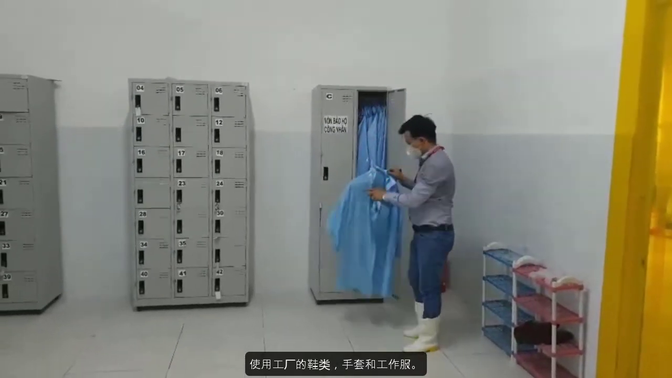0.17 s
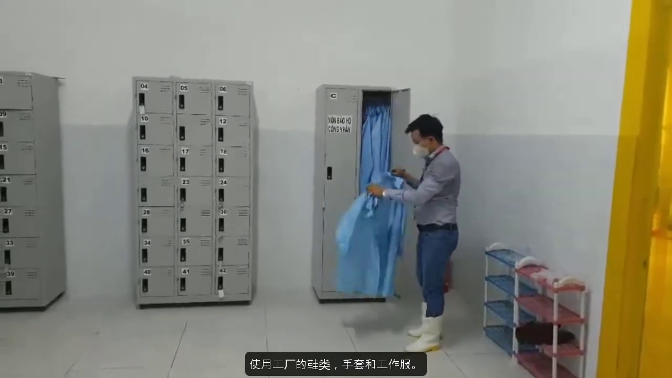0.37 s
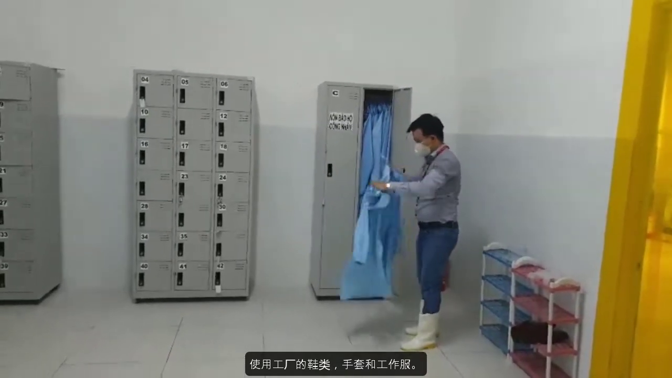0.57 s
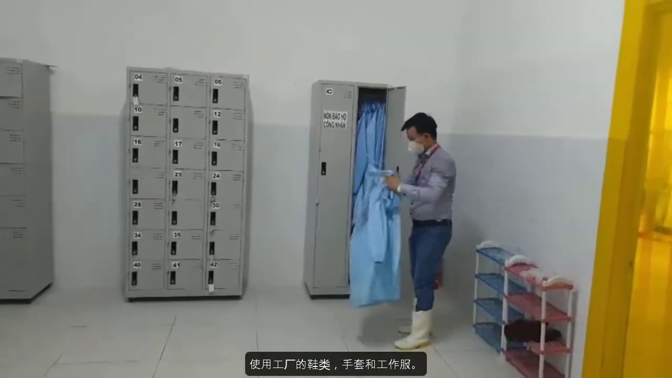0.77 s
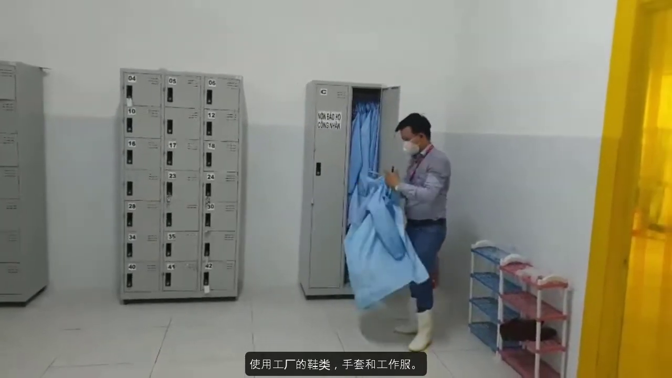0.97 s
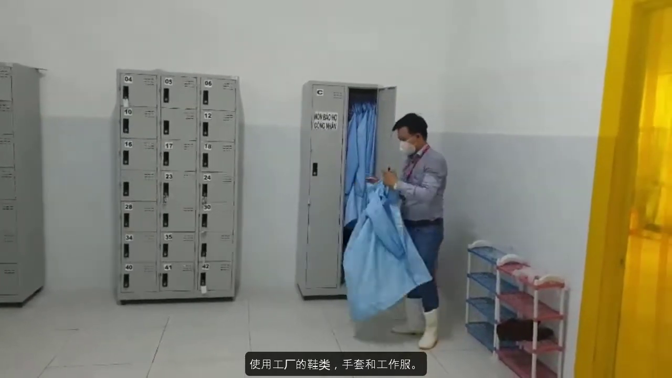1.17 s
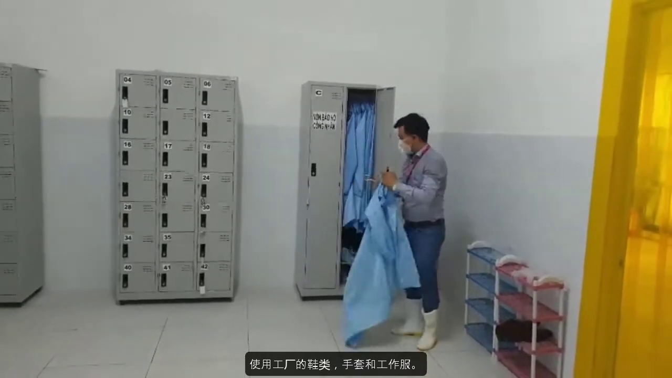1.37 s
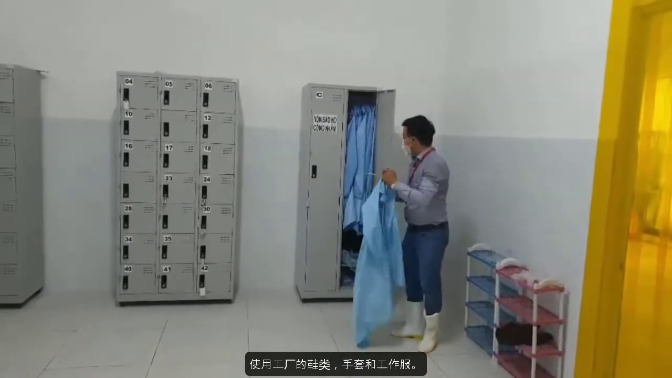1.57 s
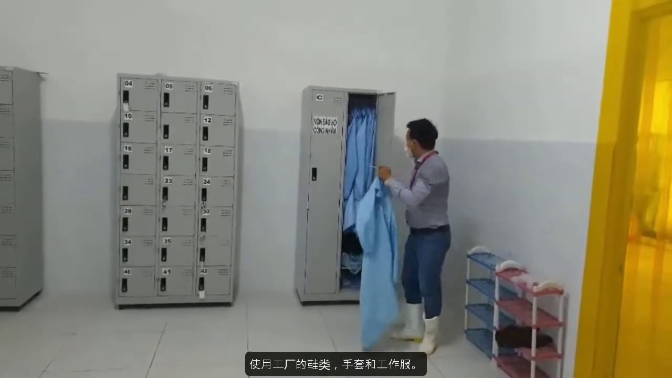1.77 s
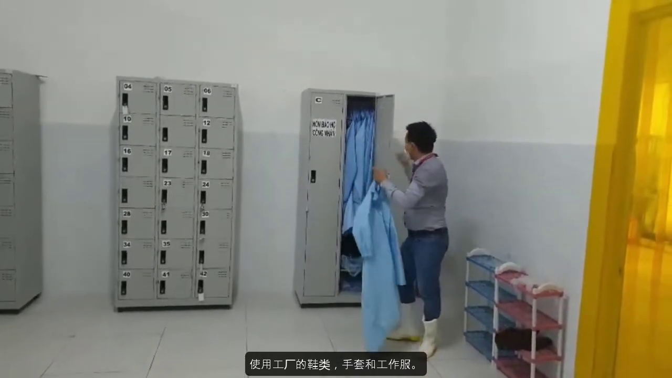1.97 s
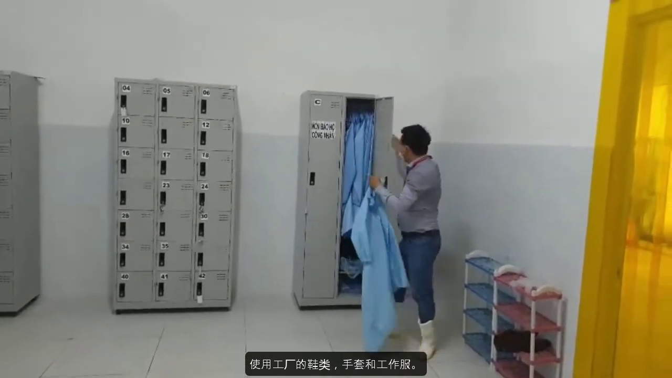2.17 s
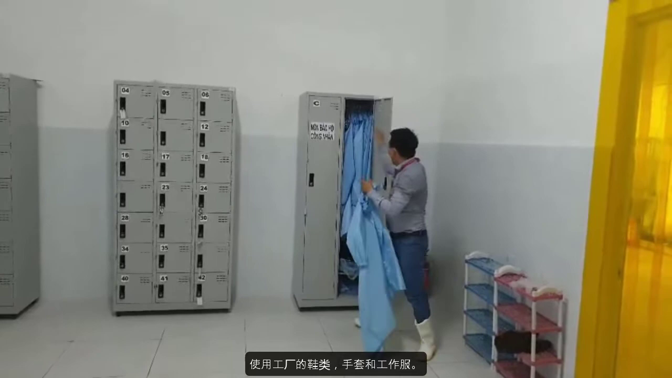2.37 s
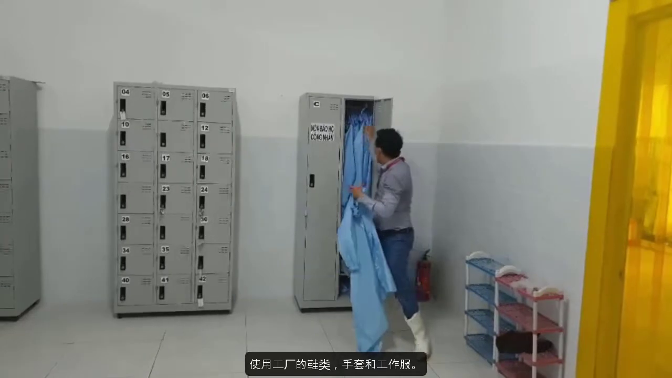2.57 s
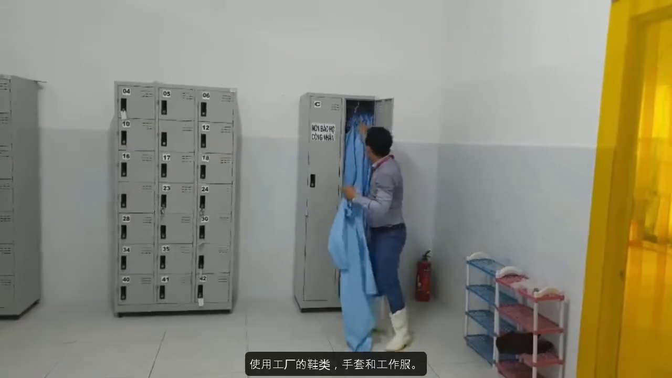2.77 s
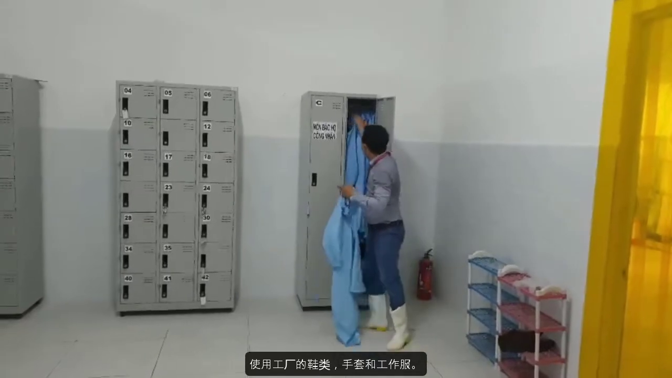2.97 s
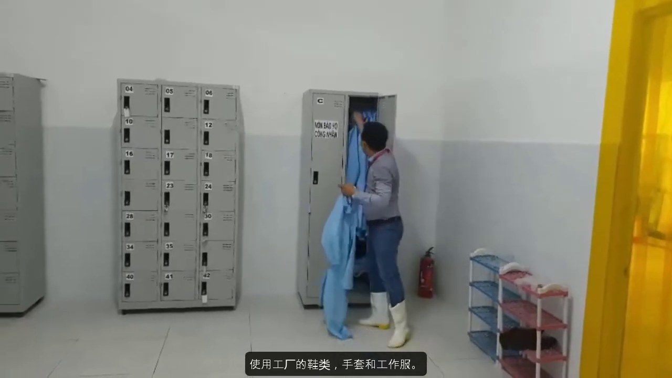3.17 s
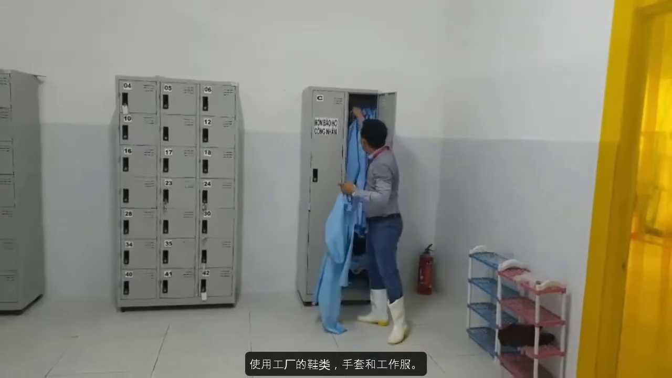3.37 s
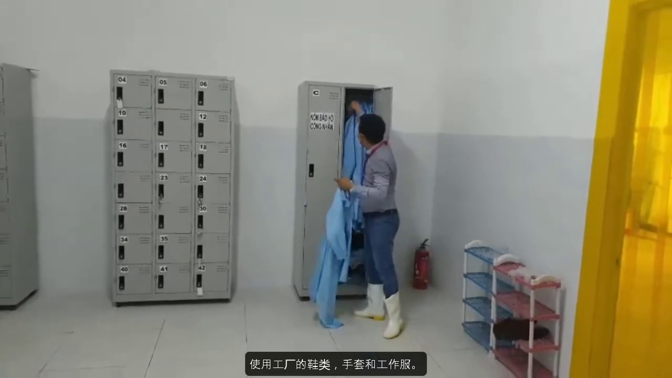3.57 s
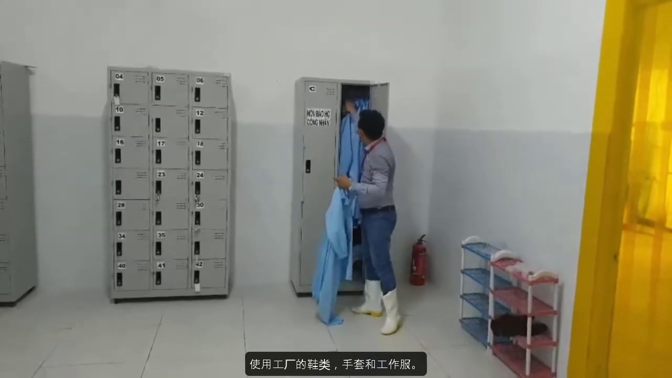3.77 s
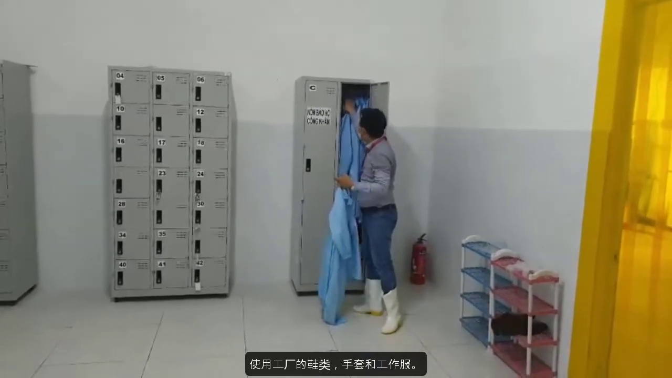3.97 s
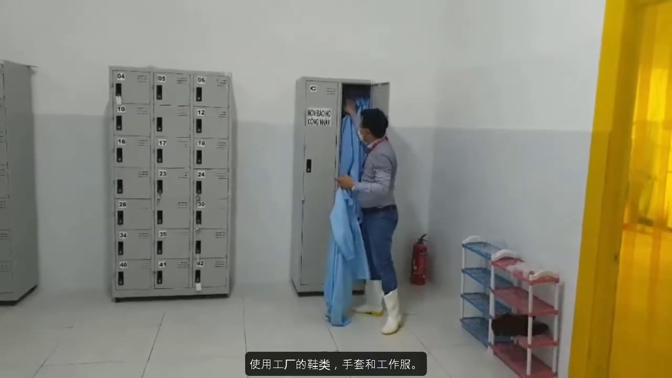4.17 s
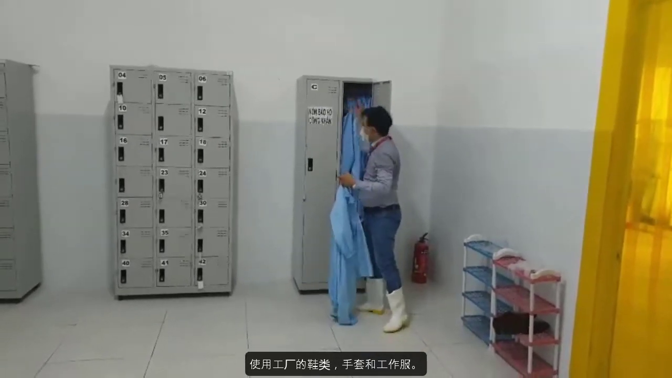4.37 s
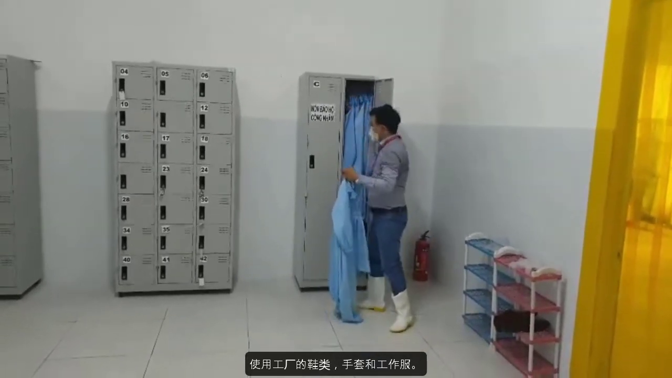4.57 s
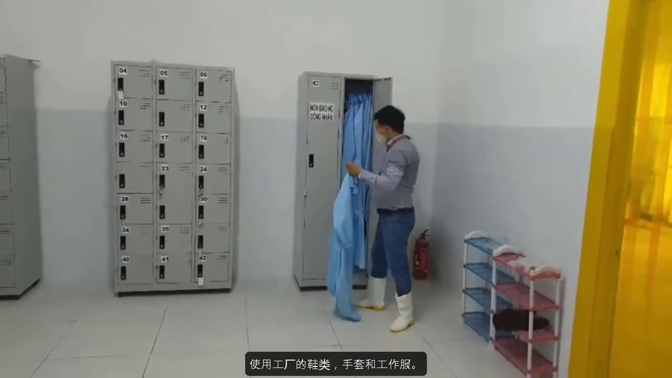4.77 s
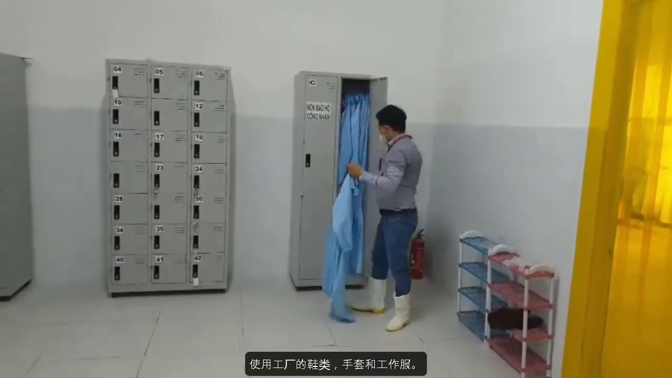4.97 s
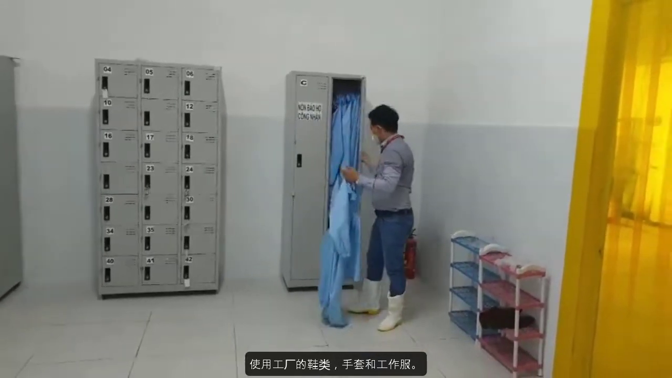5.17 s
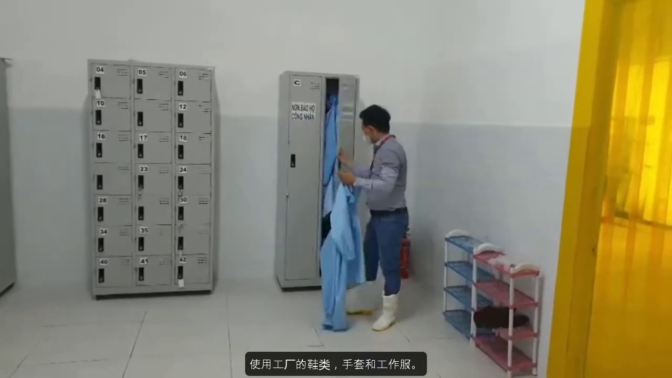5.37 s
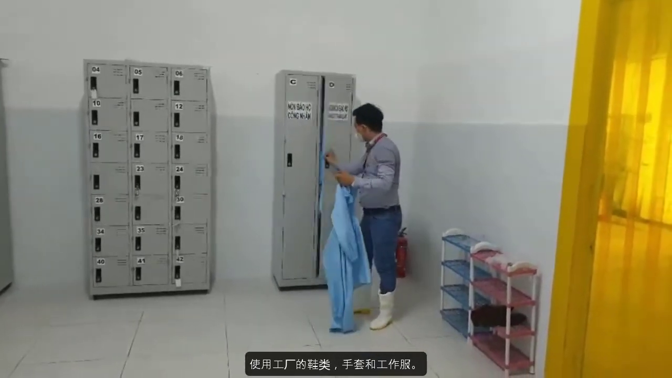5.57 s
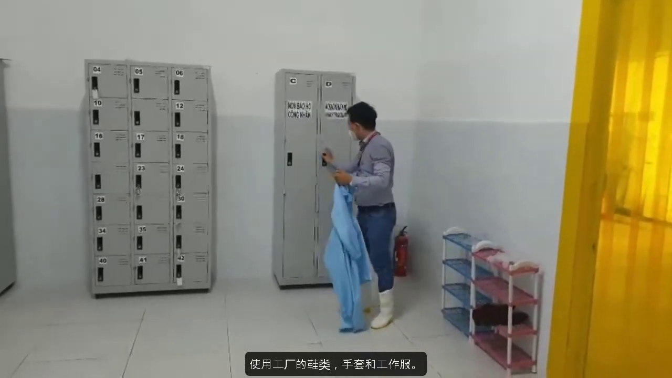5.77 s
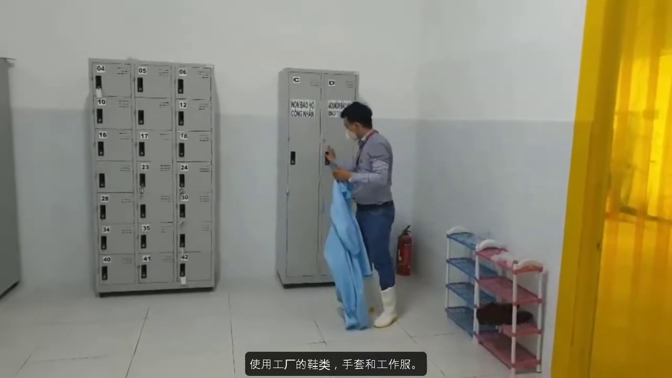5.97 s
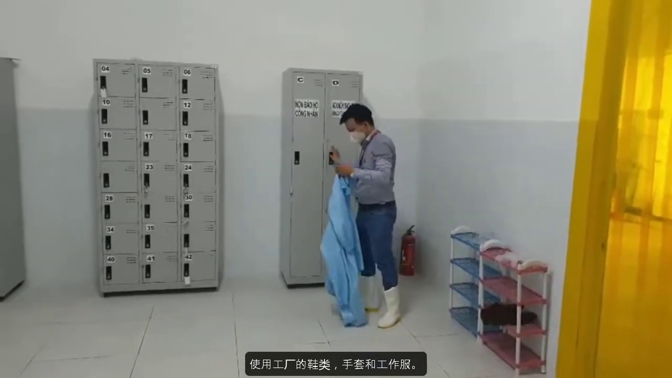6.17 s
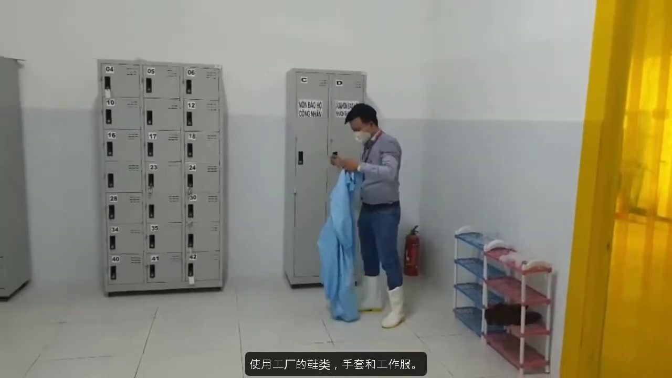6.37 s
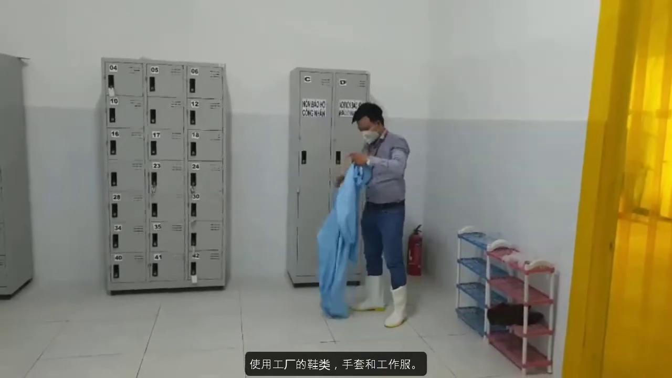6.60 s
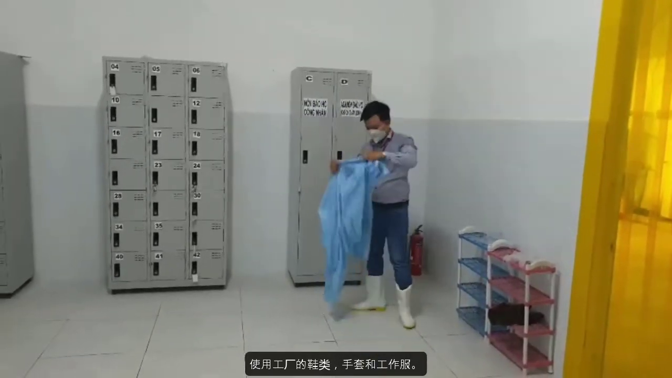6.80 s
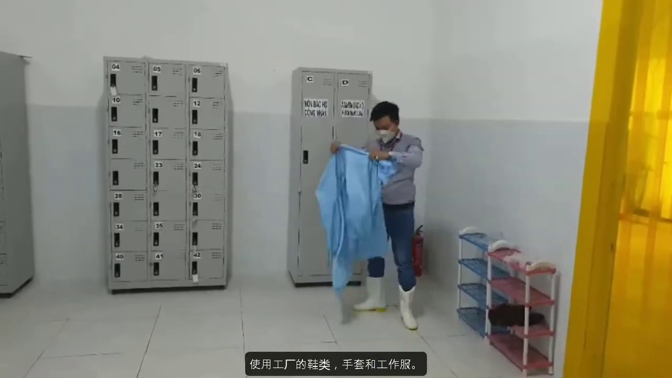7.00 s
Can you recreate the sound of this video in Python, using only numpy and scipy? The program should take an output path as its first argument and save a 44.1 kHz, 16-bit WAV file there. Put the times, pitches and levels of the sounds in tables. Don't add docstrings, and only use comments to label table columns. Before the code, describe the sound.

A phone a few metres off picks up a reverberant room with a steady fan drone and rush of duct air. Light fabric rustle comes first, followed midway by sharp, bright hanger clicks and small metallic slides among heavier cloth movement. Near the end a sheet-steel locker door slams, clattering and booming by far the loudest, and the level dips slightly as the echo fades under more rustling.

```python
import sys
import numpy as np
from scipy import signal
from scipy.fft import rfft, irfft, next_fast_len
from scipy.io import wavfile
from scipy.ndimage import uniform_filter1d, map_coordinates

SR = 44100
rng = np.random.default_rng(int(sys.argv[2]) if len(sys.argv) > 2 else 0)


def waveform_to_disk(signal):
    frames = np.transpose(np.atleast_2d(signal))
    scaled = np.clip(frames, -1, 1) * 32767
    samples = np.round(scaled).astype(np.int16)
    wavfile.write(sys.argv[1], SR, samples)


def nominal_scale(level):
    x = np.asarray(level, float) / 20
    return 10 ** x


N = 310280

# f/Hz, likeness (1 = same)
LEFT_RIGHT_LIKENESS = [(30, 0.98), (130, 1), (250, 0.91), (500, 0.66), (1000, 0.059), (12000, 0.018)]
# f/Hz, fade/s
WALL_FADE = [(100, 0.25), (200, 0.67), (320, 1.4), (600, 1.3), (2000, 1.59), (5000, 1.13), (8000, 0.8),
             (13000, 0.41)]
LAG = 17

# f/Hz, level/dB (per Hz)
AIR_SPECTRUM = [(12, -62), (20, -19), (54, -23), (81, -3), (145, -9.5), (171, -11.5), (247, -10), (286, -4),
                (349, -12.5), (383, -10), (523, -15), (714, -12), (1600, -42), (2080, -74), (3520, -120)]
# f/Hz, level/dB (per Hz)
HISS_SPECTRUM = [(880, -5), (1500, -4), (1570, -12), (1780, -11), (1940, -10), (2230, -12.5), (3120, -31.5),
                 (6470, -18), (8280, -34.5), (9640, -27.5), (14500, -37)]
AIR_DB, HISS_DB = -29.5, -49
# f/Hz, width/Hz, level/dB
DUCT_BANDS = [(59, 12, -44.5), (215, 20.4, -41.5), (419.7, 12, -46.5), (565.4, 5.8, -47), (708, 27, -42),
              (760, 23, -44.5), (1282, 19, -55.5)]
# middle t/s, length/s, level/dB
LOW_BEATS = [(0.204, 0.69, -30.5), (0.616, 0.29, -30.5), (.95, 0.39, -27), (1.4, 0.42, -33),
             (1.727, 0.21, -31), (2.04, 0.31, -33.5), (2.555, 0.61, -32.5), (3.31, 1, -37.5),
             (4.004, .36, -35), (4.3, 0.28, -29), (4.68, 0.54, -29.5), (5.306, 0.44, -26.5),
             (5.78, 0.64, -28), (6.85, 1, -32)]
# middle t/s, length/s, level/dB
MIDDLE_BEATS = [(.2, .45, -37), (0.898, 0.49, -33.5), (1.596, 0.68, -36), (2.337, 0.94, -32),
                (2.85, 0.33, -34), (3.406, 0.51, -30.5), (4.35, 0.89, -33.5), (4.9, 0.42, -32),
                (5.3, 0.57, -38), (5.95, 0.73, -30.5), (6.75, 0.45, -32.5)]
# middle t/s, length/s, level/dB
HIGH_BEATS = [(.25, 0.49, -36), (0.806, 0.62, -28.5), (1.216, 0.46, -26.5), (1.753, 0.92, -36),
              (2.44, 0.41, -27), (2.997, .5, -36.5), (3.55, 0.63, -34.5), (3.948, 0.14, -32.5),
              (4.396, 0.42, -30.5), (5.155, 0.3, -32), (5.61, 0.15, -35.5), (5.997, 0.52, -36.5),
              (6.75, 0.89, -35)]
# f/Hz, its swells
FAN_TONES = [
    (87.36, LOW_BEATS),
    (139.3, MIDDLE_BEATS),
    (279.8, HIGH_BEATS),
]

# f/Hz, level/dB (per Hz)
RUSTLE_SPECTRUM = [(1530, -6.5), (2600, -5.5), (3630, -5), (6720, -1), (8000, -10.5), (10400, -21.5),
                   (17600, -120)]
# f/Hz, level/dB (per Hz)
CRISP_SPECTRUM = [(4590, -27), (7800, -10), (8660, -8.5), (11400, -3), (14500, -6.5), (15600, -8.5)]
# f/Hz, level/dB (per Hz)
FOLD_SPECTRUM = [(260, -19), (450, -1.5), (596, -11), (783, 1), (959, -6.5), (1130, -5), (1430, -7.5),
                 (2900, -14), (3770, -48), (6380, -120)]
# start t/s, length/s, rustle level/dB, then crisp and fold level/dB above it
CLOTH_MOVES = [(-0.1, 0.15, -48, -3, 4), (0.21, 0.47, -57, 0.5, 1.5), (0.39, 0.16, -51, 0, -1),
               (0.584, 0.24, -56.5, 0, -2), (0.773, 0.062, -54.5, 4, 1), (.86, 0.67, -55.5, -0.5, -0.5),
               (1.31, 0.25, -55.5, 3.5, 0), (1.605, 0.15, -56.5, -1.5, 3), (1.7, 1.05, -68, -3, 4.5),
               (2.779, 0.22, -50.5, 3.5, 6), (3.13, .26, -53, -0.5, 3.5), (3.417, 0.11, -43.5, 4, 0),
               (3.633, 0.089, -49, 1, 3), (3.75, 0.15, -43.5, -4.5, 6), (3.893, 0.077, -50.5, 7.5, 10),
               (4.09, 0.47, -58, -1, 1), (4.987, 0.14, -51, -5.5, 7.5), (5.215, 0.47, -59, -3.5, -2),
               (5.445, 0.48, -56.5, -1.5, 2.5), (5.906, 0.024, -38, -9, 4.5), (6.02, .014, -40, -6, 13),
               (6.3, 0.46, -52, -3, 3), (6.78, 0.21, -50, -1.5, -3)]
CLOTH_LINGER = [1.48, 0.99, 1.7]
BLUNTNESS, LINGER_DB = 0.42, 6.5

# t/s, peak level/dB, body level/dB
HANGER_CLICKS = [(2.8009, -23, -4), (2.8103, -11.5, -8.5), (2.8385, -25, 5), (3.162, -16, -7),
                 (3.289, -19.5, -8), (3.427, -14, -3), (3.49, -17, -4), (3.6593, -17, -2.5),
                 (3.9395, -20, 2.5), (3.9744, -24, -6), (5.91, -46, -17)]
# t/s, f/Hz, level/dB, 60 dB fade/s
HANGER_RINGS = [(2.804, 9964, -37, .1), (2.813, 12590, -36.5, 0.23), (2.812, 15200, -27, 0.12),
                (2.812, 7106, -41, .2), (2.845, 2340, -36, .03), (2.922, 2470, -40, 0.031),
                (2.821, 207, -23, 0.16), (2.821, 320, -34, 0.48), (3.293, 2902, -41, 0.48),
                (3.96, 2394, -39, .06), (3.31, 6360, -45, .15), (3.291, 11000, -35, .05),
                (3.43, 11700, -42, .06), (3.49, 12700, -34, .1), (3.49, 14940, -47.5, .1),
                (3.661, 6110, -28.5, 0.05), (3.661, 10700, -36, 0.06), (3.89, 14100, -39, .25),
                (3.941, 7060, -37.5, 0.066), (3.949, 340.5, -30.5, 0.24), (3.975, 14000, -27.5, .1),
                (4.27, 11200, -52, .08), (4.31, 11200, -48, .08), (4.35, 11200, -53, .08),
                (4.4, 11200, -53, .08)]
# t/s, peak level/dB, f/Hz
HOOK_SCRAPES = [(3.672, -29, 1785), (3.7446, -41, 1800), (3.775, -35, 1080), (3.8407, -37, 1310),
                (3.9453, -35, 1130), (3.9782, -42, 1330), (4.041, -46, 1150)]

# t/s, crash level/dB, boom level/dB above the crash
DOOR_BOUNCES = [(6.036, -20.5, 20.5), (6.0505, 7, -12), (6.058, 6, -5), (6.073, 4.5, 0), (6.082, 1.5, -3),
                (6.091, -4, 4.5), (6.101, -6, -2), (6.113, -10, 1), (6.128, -21, 7), (6.15, -9, 4.5),
                (6.18, -21, 3)]
# f/Hz, level/dB (per Hz)
CRASH_SPECTRUM = [(900, -30), (1500, -8.5), (2100, -5.5), (3100, -7), (3700, -6), (4200, -5), (5200, -5),
                  (6600, -2), (7300, -11), (8200, -11), (10800, -6), (13000, -2), (15700, -7)]
# f/Hz, level/dB (per Hz)
BOOM_SPECTRUM = [(24, -40), (40, -16), (70, -3.5), (140, -6.5), (193, -9.5), (247, -13.5), (284, -10),
                 (405, -14.5), (480, -15.5), (695, -10), (1600, -19.5), (2080, -38), (3520, -120)]
# f/Hz, level/dB, 60 dB fade/s
PANEL_MODES = [(59.6, -12, 0.45), (135, -7, 0.35), (183, -9, 0.38), (211.6, -12.5, 0.6), (491, -15, 0.11),
               (639, -22, 0.18), (870, -18.5, 0.26), (993, -11.5, 0.12), (1099, -13.5, 0.32),
               (1196, -12.5, 0.25), (1233, -15.5, 0.2), (2930, -32, 0.047), (2980, -17, 0.11)]
# f/Hz, level/dB, 60 dB fade/s
LATCH_MODES = [(4300, -13, .03), (5100, -16, .03), (6500, -18, .03), (10900, -11, .025), (13118, -5, .035)]
BOOM_SWELL_S = 0.012
CABINET_LATE_S = 0.0202

# t/s, level/dB
PHONE_GAIN = [(0, -0.5), (6.05, 0), (6.1, -4), (6.5, -5), (7.04, -3.5)]
# f/Hz, level/dB (per bin)
FAINTEST_TREBLE = [(11000, -125), (12500, -92), (14000, -80), (15500, -77.5)]
TOP_HZ = 15750


def unit(x):
    return x / np.sqrt(np.mean(x ** 2) + 1e-20)


def along(points, hz):
    f, v = np.transpose(points)
    return np.interp(np.log(hz + 1), np.log(f + 1), v)


def curve(rows, column):
    rows = np.array(rows)
    return np.interp(np.arange(N) / SR, rows[:, 0], rows[:, column])


def wobble(rate):
    knots = rng.standard_normal(int(N * rate / SR) + 4)
    return map_coordinates(knots, [np.arange(N) * rate / SR])


def hump(start, length):
    return np.sin(np.pi * np.clip((np.arange(N) / SR - start) / length, 0, 1)).clip(0)


def filtered(x, response):
    m = next_fast_len(x.shape[-1] + 8192)
    return irfft(rfft(x, m) * response(np.fft.rfftfreq(m, 1 / SR)), m)[..., :x.shape[-1]]


def diffuse(pair):
    def mid_and_side(hz):
        turn = np.arccos(np.clip(along(LEFT_RIGHT_LIKENESS, hz), -1, 1)) / 2
        return np.array([np.cos(turn), np.sin(turn)])

    mid, side = filtered(pair, mid_and_side)
    return np.array([mid + side, mid - side])


def noise(spectrum):
    white = rng.standard_normal((2, N))
    return unit(diffuse(filtered(white, lambda hz: nominal_scale(along(spectrum, hz)))))


def ventilation():
    air = nominal_scale(AIR_DB + 0.2 * wobble(2.36) + 0.75 * wobble(9)) * noise(AIR_SPECTRUM)
    air += nominal_scale(HISS_DB) * noise(HISS_SPECTRUM)
    for hz, width, db in DUCT_BANDS:
        white = rng.standard_normal((2, N))
        band = filtered(white, lambda f: 1 / (1 + ((f - hz) / width) ** 2))
        air += nominal_scale(db) * unit(diffuse(band))
    for hz, beats in FAN_TONES:
        phase = 2 * np.pi * np.cumsum(hz + 3.446 * wobble(7)) / SR
        apart = 0.17 * wobble(3.4) * [[1], [-1]]
        swell = np.zeros(N)
        for k, (middle, length, db) in enumerate(beats):
            swell += (-1) ** k * nominal_scale(db + 0.5) * hump(middle - length / 2, length)
        air += swell * np.sin(phase + apart)
    return air


def lingering(power, t60):
    keep = nominal_scale(-2 * 60 / (t60 * SR))
    room = signal.lfilter([1 - keep], [1, -keep], power)
    return np.sqrt(power + nominal_scale(2 * LINGER_DB) * room)


def clothes():
    start, length, rustle_db, crisp_db, fold_db = np.transpose(CLOTH_MOVES)
    moving = np.array([hump(s, d) ** BLUNTNESS for s, d in zip(start, length)])
    slips = [nominal_scale(rustle_db + db) ** 2 @ moving for db in (0, crisp_db, fold_db)]
    rustle, crisp, fold = [lingering(power, t60) for power, t60 in zip(slips, CLOTH_LINGER)]
    clumps = 0.8 * wobble(12) + 0.95 * wobble(160)
    layers = rustle * noise(RUSTLE_SPECTRUM)
    layers += crisp * nominal_scale(0.87 * wobble(40)) * noise(CRISP_SPECTRUM)
    layers += fold * noise(FOLD_SPECTRUM)
    return nominal_scale(clumps) * layers


def placed(x, s, direct_db, room_db, fill, lag=LAG):
    hz, t, z = signal.stft(rng.standard_normal((2, SR * 3 // 2)), SR, nperseg=256)
    fade = nominal_scale(-60 * t / along(WALL_FADE, hz)[:, None])
    tail = signal.istft(z * fade, SR, nperseg=256)[1]
    tail = diffuse(tail * (1 - np.exp(-np.arange(tail.shape[1]) / SR / fill)))
    tail = tail / np.linalg.norm(tail[0])
    wet = nominal_scale(room_db) * signal.fftconvolve(x[None], tail, axes=1)
    wet[0, lag:len(x) + lag] += nominal_scale(direct_db) * x
    wet[1, :len(x)] += nominal_scale(direct_db) * x
    return np.pad(wet, ((0, 0), (round(s * SR), N)))[:, :N]


def ring(hz, t60, attack, loose):
    t = np.arange(SR // 2) / SR
    step = loose + .125 * (hz / 13000) ** 1.6
    wander = step * np.cumsum(rng.standard_normal(len(t)))
    envelope = nominal_scale(-60 * t / t60) * (1 - np.exp(-t / attack))
    return envelope * np.sin(2 * np.pi * (hz * t + rng.random()) + wander)


def chatter(t, t60):
    z = rfft(rng.standard_normal(len(t)) * nominal_scale(-60 * t / t60))
    local_power = uniform_filter1d(np.abs(z) ** 2, size=len(t) * 150 // SR + 1)
    return unit(irfft(z / np.sqrt(local_power), len(t)))


def hangers():
    t = np.arange(SR // 20) / SR
    high = signal.butter(2, 8200 / SR * 2, "high")
    mid = signal.butter(1, [1400 / SR * 2, 7000 / SR * 2], "band")
    blow = 3 * (t == 0)
    out = np.zeros((2, N))
    for s, db, body_db in HANGER_CLICKS:
        bright = signal.lfilter(*high, 0.072 * chatter(t, 0.036) + blow)
        body = signal.lfilter(*mid, 0.072 * chatter(t, 0.017) + blow)
        crack = bright + nominal_scale(body_db) * body
        out += placed(nominal_scale(db) * crack, s, direct_db=1, room_db=5, fill=.004)
    rings = np.zeros(N + SR)
    for s, hz, db, t60 in HANGER_RINGS:
        tone = ring(hz, t60, attack=.001 + 2.5 / hz, loose=.014)
        rings[round(s * SR):][:SR // 2] += nominal_scale(db) * tone
    for s, db, hz in HOOK_SCRAPES:
        scrape = ring(hz, 0.057, attack=.001, loose=.08)
        rings[round(s * SR):][:SR // 2] += nominal_scale(db - 5) * scrape
    return out + placed(rings[:N], 0, direct_db=7.5, room_db=2, fill=0.0066)


def steel_crash(t):
    return unit(filtered(chatter(t, 0.038), lambda hz: nominal_scale(along(CRASH_SPECTRUM, hz))))


def cabinet_boom(t):
    rumble = unit(filtered(rng.standard_normal(len(t)), lambda hz: nominal_scale(along(BOOM_SPECTRUM, hz))))
    return rumble * nominal_scale(-60 * t / 0.099) * (1 - np.exp(-t / BOOM_SWELL_S))


def struck(modes):
    out = np.zeros(SR // 2)
    for hz, db, t60 in modes:
        attack = min(8 / hz, .02) * (hz < 4000) + .001
        out += nominal_scale(db) * ring(hz, t60, attack, loose=min(hz / 24000, .05))
    return out


def door():
    t = np.arange(SR // 6) / SR
    out = np.zeros((2, N))
    for s, db, boom_db in DOOR_BOUNCES:
        bang = steel_crash(t) + nominal_scale(boom_db + 17.5) * cabinet_boom(t)
        out += placed(nominal_scale(db - 25.5) * bang, s, direct_db=-5, room_db=5, fill=.002)
    blow_s = DOOR_BOUNCES[1][0]
    deep, skin, latch = struck(PANEL_MODES[:4]), struck(PANEL_MODES[4:]), struck(LATCH_MODES)
    out += placed(deep, blow_s + CABINET_LATE_S, direct_db=0, room_db=-6, fill=.01)
    out += placed(skin, blow_s, direct_db=1, room_db=-2, fill=.003, lag=LAG // 2)
    out += placed(latch, blow_s, direct_db=0, room_db=0, fill=.003)
    return out


def scene():
    return (ventilation() + clothes() + hangers() + door()) * nominal_scale([[.6], [-.6]])


def thinned(x):
    hz, _, z = signal.stft(x, SR, nperseg=1024)
    power = np.mean(np.abs(z) ** 2, 0)
    power = uniform_filter1d(uniform_filter1d(power, size=15, axis=0), size=5, axis=1)
    margin_db = 10 * np.log10(np.abs(power) + 1e-20) - along(FAINTEST_TREBLE, hz)[:, None]
    keep = np.clip(margin_db / 2 + .5, 0, 1) * (hz < TOP_HZ)[:, None]
    return signal.istft(z * keep, SR, nperseg=1024)[1][:, :N]


def low_pass(x):
    return signal.sosfilt(signal.butter(12, 15750, fs=SR, output="sos"), x)


def record(dry):
    x = dry * nominal_scale(curve(PHONE_GAIN, column=1))
    x = x / (1 + np.abs(x / 1.05) ** 6) ** (1 / 6)
    return low_pass(thinned(x))


dry = scene()
out = record(dry)
waveform_to_disk(out)
```